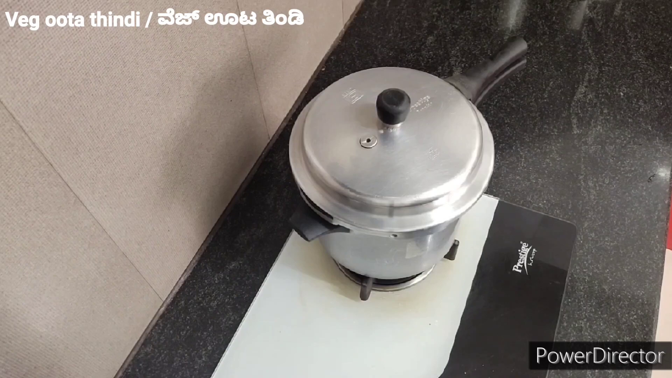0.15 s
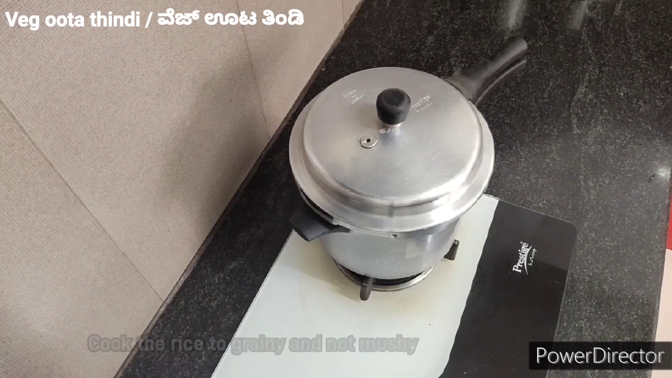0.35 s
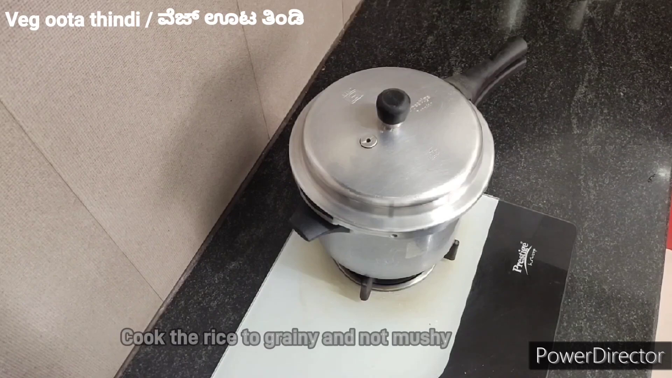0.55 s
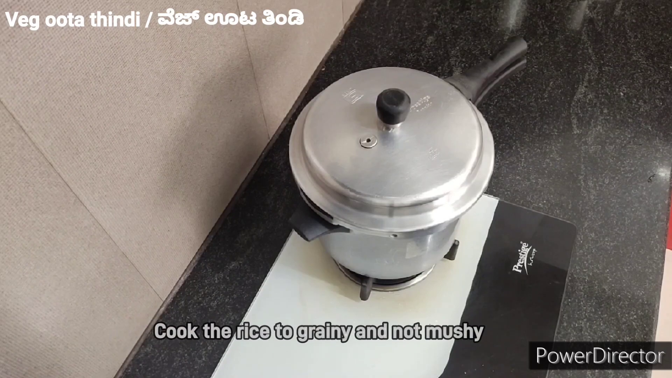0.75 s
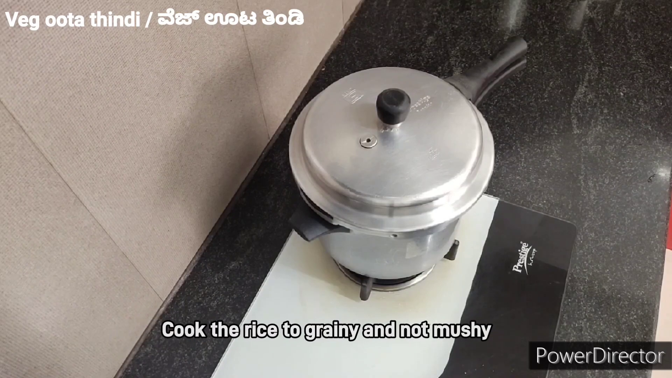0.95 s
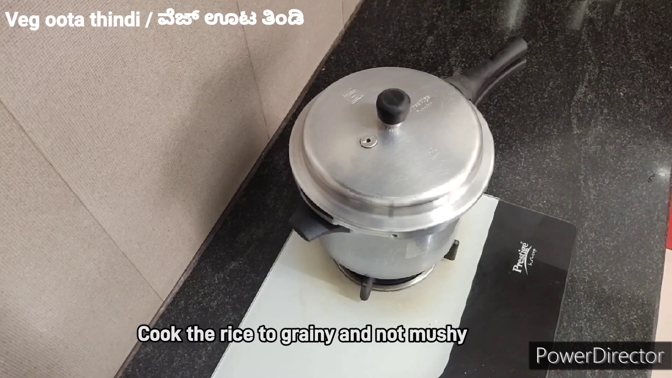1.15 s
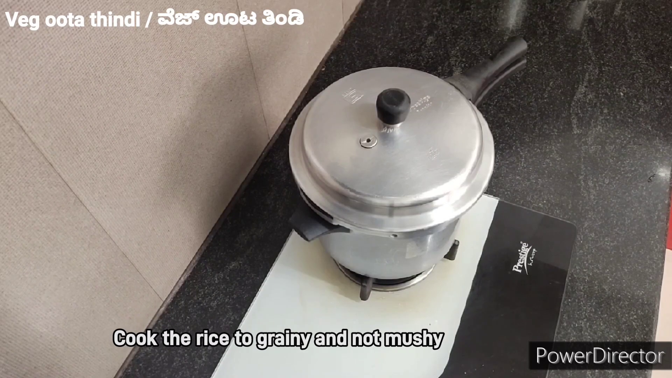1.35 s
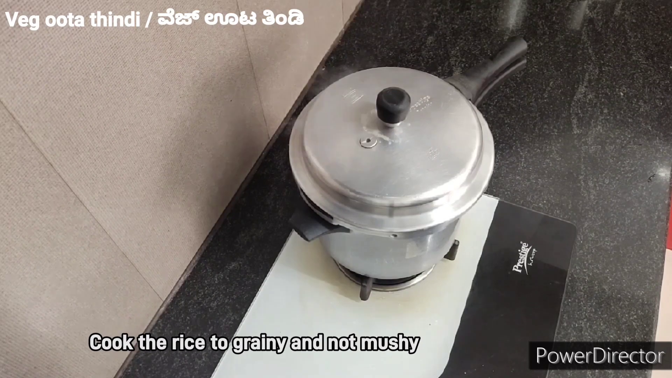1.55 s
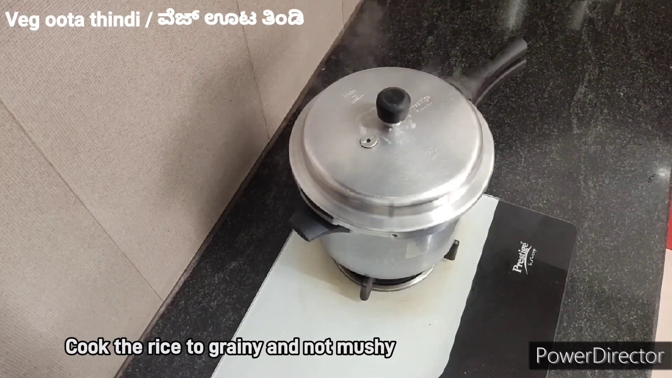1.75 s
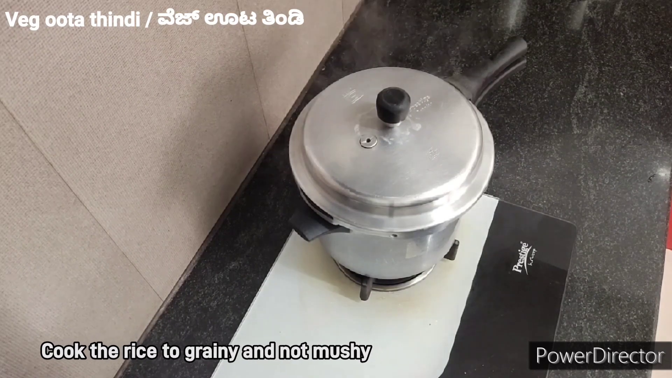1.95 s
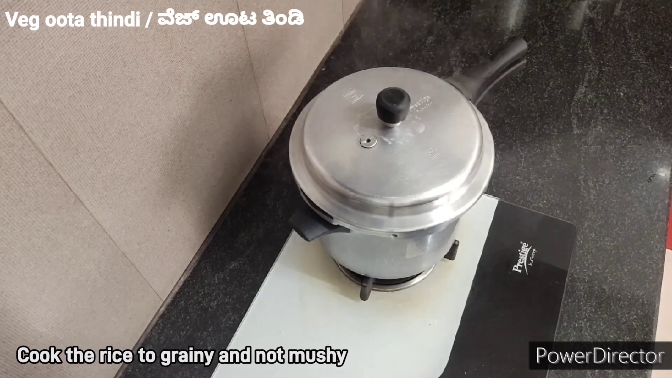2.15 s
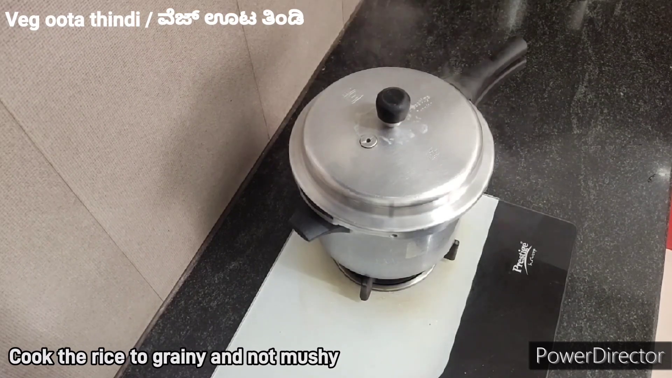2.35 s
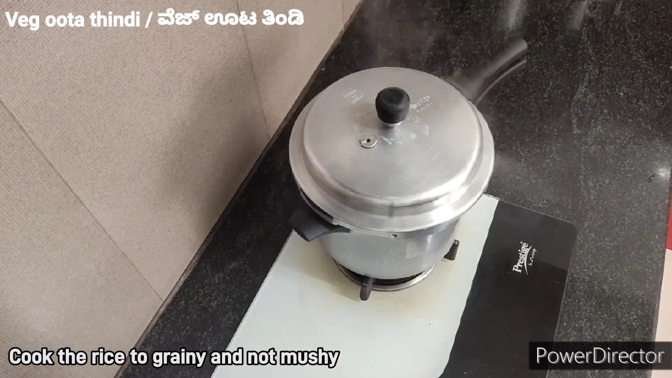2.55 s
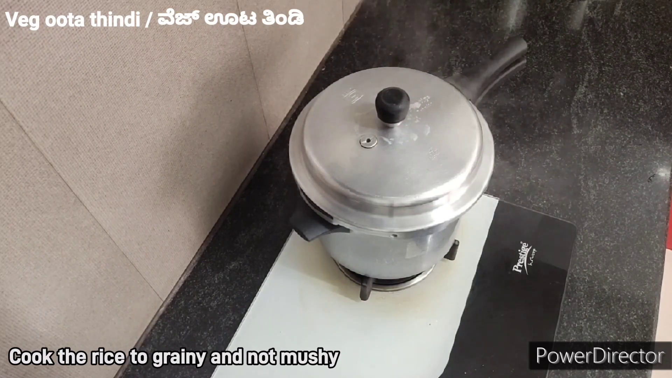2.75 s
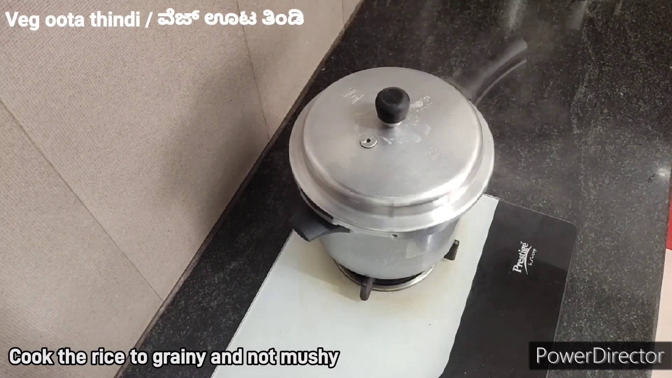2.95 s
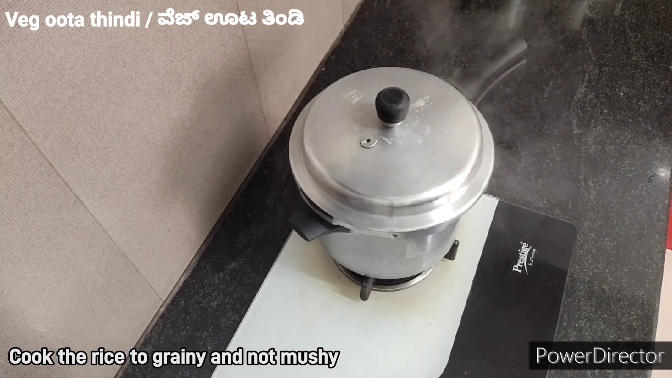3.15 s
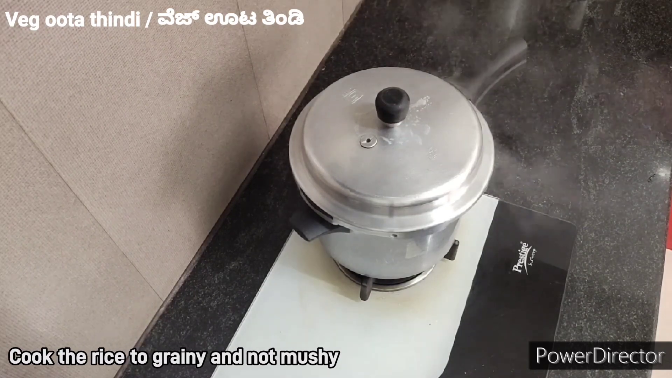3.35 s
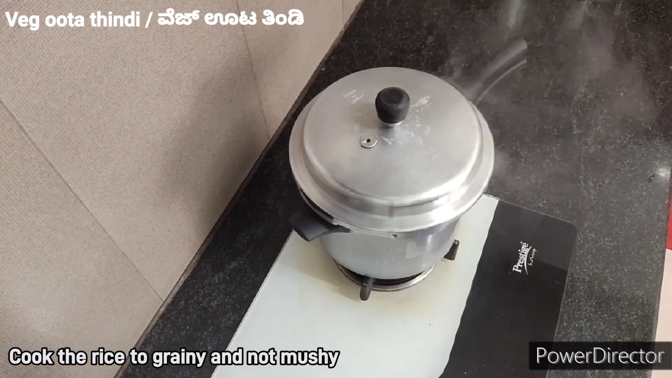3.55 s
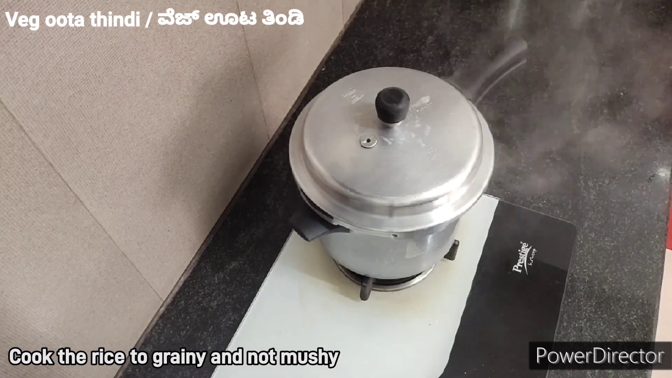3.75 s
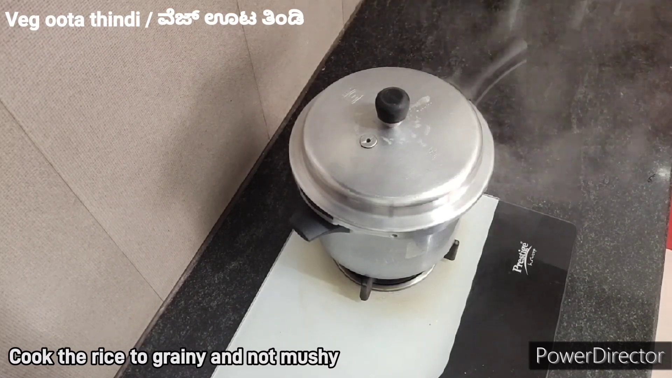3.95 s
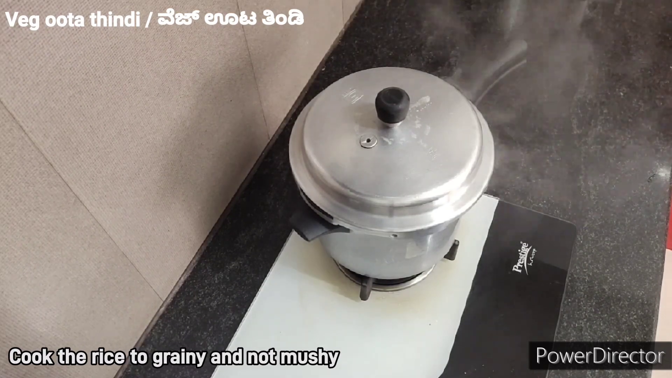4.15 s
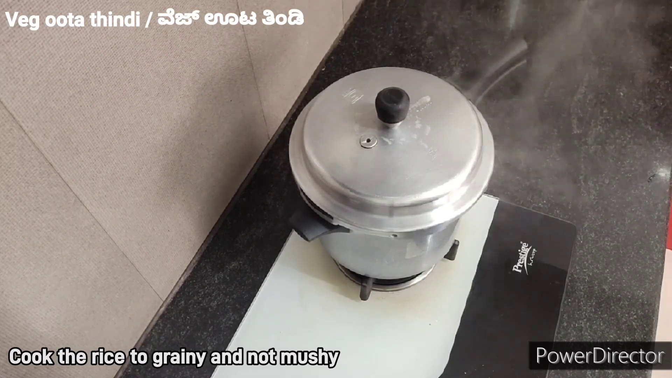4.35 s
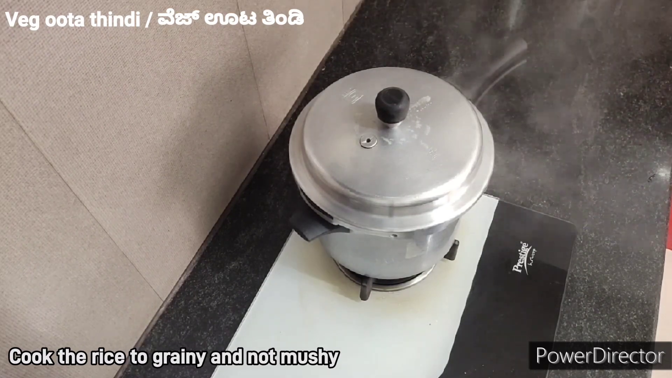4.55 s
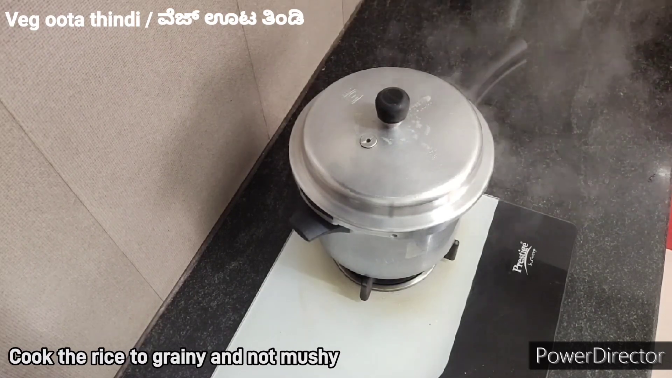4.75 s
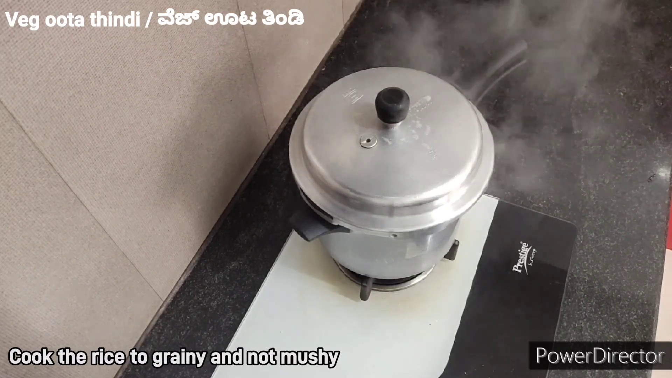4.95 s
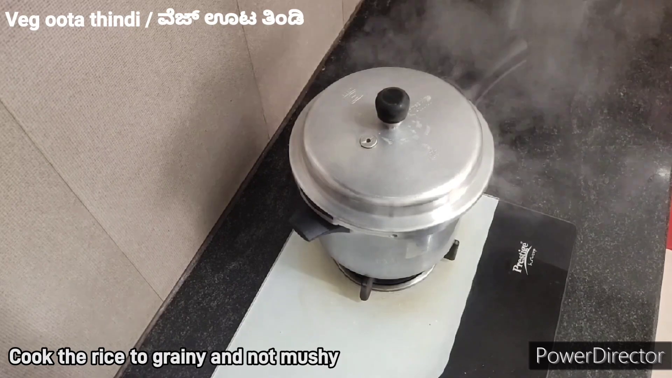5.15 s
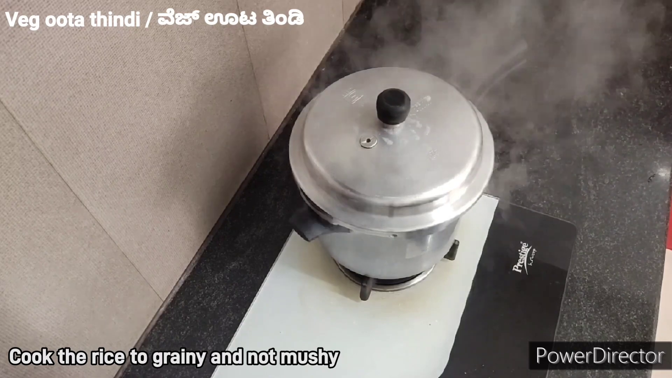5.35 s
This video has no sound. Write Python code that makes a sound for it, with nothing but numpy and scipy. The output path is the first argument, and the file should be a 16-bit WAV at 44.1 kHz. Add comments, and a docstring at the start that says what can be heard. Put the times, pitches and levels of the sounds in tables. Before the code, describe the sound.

Close above a pressure cooker on a gas burner in a hard tiled kitchen. Soft low flame murmur, muffled bubbling and a thin sharp steam leak build slightly, then at about 1.7 seconds the weight lifts with wet spits and a loud bright hiss bursts out and holds to the end, dulling a little late.

```python
"""Pressure cooker on a gas burner

Heard from just above the lid in a tiled kitchen: flame and bubbles murmur, and steam leaks past the weight.
The weight lifts with wet spurts, and the full jet hisses. Steam is noise plus droplet impulses, coloured by
gap and lid; the plume and stove are low noise, bubbles are rising rings, hums and whistles narrow noise.
A synthetic response of decaying random echoes spreads the hiss as a hard room does."""
import sys
import numpy as np
from scipy import signal
from scipy.fft import rfft, irfft, next_fast_len
from scipy.io import wavfile
from scipy.ndimage import uniform_filter1d

SR = 44100
rng = np.random.default_rng(int(sys.argv[2]) if len(sys.argv) > 2 else 0)


def to_wav(sig):
    """Store sig (one row per channel, or 1-D mono) as 16-bit WAV at the path in sys.argv[1].

    Samples outside -1..1 are clipped; the rate is SR.
    """
    pcm = np.clip(np.atleast_2d(sig), -1, 1) * 32767
    pcm = np.round(pcm).astype(np.int16)
    wavfile.write(sys.argv[1], SR, pcm.T)  # frames by channels


N = 237698
PADDED = next_fast_len(N + SR, True)  # room for echoes to die
TIME, BINS = np.arange(N) / SR, np.fft.rfftfreq(PADDED, 1 / SR)


def gain_of(db):
    """Decibels to an amplitude factor."""
    return 10 ** (np.asarray(db) / 20)


def evened(x):
    """Scales to an rms of one."""
    return x / np.sqrt(np.mean(x ** 2) + 1e-20)


def read(points, hz):
    """Interpolates each column of a table over log frequency."""
    f, *columns = np.transpose(points)
    return [np.interp(np.log(hz + 1), np.log(f + 1), c) for c in columns]


def follow(rows):
    """Interpolates each column of a table over time."""
    s, *columns = np.transpose(rows)
    return [np.interp(TIME, s, c) for c in columns]


def coloured(x, gain):
    """Filters by a gain for each frequency bin."""
    return irfft(rfft(x, PADDED) * gain, PADDED)[..., :N]


def wander(rate_hz):
    """Random motion of rms one, mostly slower than the rate."""
    return evened(coloured(rng.standard_normal(N), np.exp(-(BINS / rate_hz) ** 2)))


def crest(s, half_s):
    """Gaussian bump of height one, down to 1/e at the half length."""
    return np.exp(-((TIME - s) / half_s) ** 2)


def step(s, half_s):
    """Smooth rise from zero to one."""
    return .5 + .5 * np.tanh((TIME - s) / half_s)


def pair(spectrum, likeness):
    """Coloured noise at two ports, correlated by the likeness."""
    a, b = evened(coloured(rng.standard_normal((2, N)), gain_of(read(spectrum, BINS)[0])))
    likeness = np.clip(likeness, -1, 1)
    return np.array([a, likeness * a + np.sqrt(1 - likeness ** 2) * b])


def swells(rows, width_hz):
    """Breathy tones: narrow bands of noise that come and go."""
    out = np.zeros(N)
    for s, half_s, hz, db in rows:
        resonance = 1 / (1 + (2 * (BINS - hz) / width_hz) ** 2)
        band = evened(coloured(rng.standard_normal(N), resonance))
        out += gain_of(db) * band * crest(s, half_s)
    return out


# Flame and boil. Each row: time in seconds, level in dB.
STOVE_LEVEL = [(0, -65.5), (.7, -65), (.97, -66), (1.28, -63.5), (1.35, -54.5), (1.55, -60.5), (1.68, -62),
               (5.39, -94)]
# Their spectrum. Each row: frequency in Hz, relative density in dB per Hz.
STOVE_SPECTRUM = [(18, -7), (32, -6), (50, 5), (62, -8), (75, 9), (93, -10), (118, -0.5), (170, -4.5),
                  (290, -5.5), (400, -16), (540, -11.5), (800, -24), (2000, -49)]


def stove():
    """Flame and boiling water: low noise, nearly alike at both ports."""
    level_db = follow(STOVE_LEVEL)[0] + 0.46 * wander(21)
    return pair(STOVE_SPECTRUM, likeness=0.93) * gain_of(level_db)


# Faint hums. Each row: crest in seconds, half length in seconds, centre in Hz, level in dB.
HUMS = [(0.02, 0.025, 857, -63), (.5, 0.18, 896, -75), (0.082, 0.13, 264, -62.5), (.2, 0.08, 122, -63),
        (.55, 0.3, 116, -63), (.87, 0.11, 314, -66.5), (1.15, 0.11, 308, -67), (1.36, 0.033, 120, -60),
        (1.5, 0.096, 113, -57.5), (1.728, 0.058, 290, -58)]


def hums():
    """Faint low narrow-band noises swell and fade."""
    return swells(HUMS, width_hz=44)


def burble(level_db=-72, bubbles_per_s=45, low_hz=447, high_hz=1910, decay_s=0.013, glide_per_s=1.1, sizes=24):
    """Bubbles burst inside the pot, muffled by the lid; each size rings briefly and rises in pitch."""
    age, out = np.arange(SR // 8) / SR, np.zeros(N)
    envelope = age / decay_s * np.exp(-age / decay_s)
    for hz in np.geomspace(low_hz, high_hz, sizes):
        ring = envelope * np.sin(2 * np.pi * hz * age * (1 + glide_per_s * age / 2))
        pops = (rng.random(N) < bubbles_per_s / sizes / SR) * rng.uniform(.5, 2, N)
        out += signal.oaconvolve(pops, ring)[:N]
    return gain_of(level_db) * evened(out)


# Resonances of lid and weight. Each row: centre in Hz, width in Hz, lift in dB.
LID_RINGS = [(1745, 35, 3), (2300, 110, 2.5), (2440, 40, 2), (2596, 32, 3), (2749, 24, 3.5),
             (2825, 30, 2.5), (2909, 24, 3.5), (2965, 22, 3), (3035, 28, 4), (3149, 22, 2), (3380, 38, 4.5),
             (3550, 30, 3), (3603, 32, 3.5), (3849, 24, 2.5), (5100, 200, 2), (5775, 38, 4),
             (6627, 80, 1.5), (7090, 60, 2), (7276, 54, 1.5), (7628, 24, 3), (8058, 43, 3.5), (8204, 20, 3)]


def steam(level_db, throat_db, edge_db, fizz_db, spectrum, drops_db, drops_per_s,
          flutter_db, flutter_hz, surge_db):
    """Three streams of turbulence and bursting droplets, coloured by the weight's cavity and the lid."""
    chance, size = rng.random(N), np.minimum(rng.exponential(1, N), 4)
    turbulence, splash = rng.standard_normal(size=(2, 3, N))
    drops = evened((chance < drops_per_s / SR) * size * np.sign(splash))
    # the loose weight chatters and chops the flow
    chatter = gain_of(flutter_db * wander(flutter_hz) + surge_db * wander(39))
    drive = (turbulence + gain_of(drops_db) * drops) * chatter
    rings_db = sum(db / (1 + (2 * (BINS - hz) / width_hz) ** 2) for hz, width_hz, db in LID_RINGS)
    hiss = evened(coloured(drive, gain_of(read(spectrum, BINS)[0] + rings_db)))

    def below(hz):
        return coloured(hiss, .5 - .5 * np.tanh((BINS - hz) / 350))

    # as the gap changes, throat, edge tone and fizz move against the body
    under_body, under_edge, under_fizz = below(2000), below(4100), below(9200)
    throat = under_body * gain_of(throat_db + 0.82 * wander(26))
    body = under_edge - under_body
    edge = (under_fizz - under_edge) * gain_of(edge_db + 0.48 * wander(24))
    fizz = (hiss - under_fizz) * gain_of(fizz_db + 1.2 * wander(40))
    return (throat + body + edge + fizz) * gain_of(level_db)


def patchy(x, depth_db, size=2048):
    """The wobbling weight shifts emphasis among narrow bands; broad bands stay nearly steady."""
    z = signal.stft(x, nperseg=size)[2]
    field = rng.standard_normal(z.shape[-2:])
    field = uniform_filter1d(uniform_filter1d(field, size=4, axis=0), size=4, axis=1)
    field = field - uniform_filter1d(field, size=50, axis=0)
    return signal.istft(z * gain_of(depth_db * evened(field)), nperseg=size)[1][..., :N]


# Leak spectrum. Each row: frequency in Hz, relative density in dB per Hz.
LEAK_SPECTRUM = [(300, -22.5), (780, -22), (1050, -20), (1400, -11), (1750, -15.5), (2250, -9),
                 (2550, -10.5), (2780, -4.5), (3050, -11.5), (3300, -13.5), (3750, -17), (4400, -11),
                 (5100, -8.5), (6100, -11.5), (7100, 1.5), (8100, -4.5), (9300, -22.5), (15400, -22)]
# The weight rocks and lets more through. Each row: crest in seconds, half length in seconds, lift in dB.
LEAK_PUFFS = [(0.01, 0.043, 8), (0.123, 0.071, 3.5), (0.775, 0.07, 2), (0.89, 0.061, 2.5), (1.14, 0.064, 3),
              (1.42, 0.08, 1.5)]


def leak(start_db=-49, rise_db_per_s=3, throat_db=-2.5, edge_db=-2.0, fizz_db=-2.5,
         throat_per_db=0.7, edge_per_db=0.53, fizz_per_db=1.28):
    """Steam seeps past the seated weight, sharper as pressure builds and broader in each puff."""
    build_db = rise_db_per_s * TIME
    puffs_db = sum(db * crest(s, half_s) for s, half_s, db in LEAK_PUFFS)
    return steam(start_db + build_db + puffs_db,
                 throat_db + throat_per_db * puffs_db,
                 edge_db + edge_per_db * build_db,
                 fizz_db + fizz_per_db * (build_db + puffs_db),
                 LEAK_SPECTRUM, drops_db=-12, drops_per_s=1300,
                 flutter_db=0.5, flutter_hz=250, surge_db=1.0)


# Wet spurts. Each row: start in seconds, level in dB, centre in Hz, decay in seconds.
SPURTS = [(1.551, -49, 3000, 0.0023), (1.597, -33.5, 2280, 0.0032), (1.608, -42, 1990, .014),
          (1.636, -41, 1400, .006), (1.649, -32, 1030, 0.0026), (1.65, -25.5, 3800, 0.0035),
          (1.662, -39, 3600, .022), (1.718, -39, 1000, 0.028), (1.718, -29, 2900, .014),
          (1.82, -36, 330, 0.0027), (1.896, -27.5, 1700, .004), (1.932, -26.5, 434, 0.0024),
          (1.985, -43, 350, .003), (2.507, -30, 550, 0.0076), (3.378, -42, 130, 0.0087),
          (3.736, -29.5, 400, 0.0069), (4.636, -37, 500, 0.0049)]


def spurts():
    """Slugs of water clear the vent, each a short broad puff."""
    out = np.zeros(N)
    for s, db, hz, decay_s in SPURTS:
        broad_band = np.exp(-(np.log((BINS + 1) / hz) / 0.89) ** 2)
        puff = evened(coloured(rng.standard_normal(N), broad_band))
        age = np.maximum(TIME - s, 0) / decay_s
        out += gain_of(db) * puff * age * np.exp(1 - age)
    return out


# Roar of the plume. Each row: time in seconds, level in dB.
PLUME_LEVEL = [(1.70, -62), (1.79, -53.5), (1.84, -43.5), (1.95, -45.5), (2.1, -44.5), (2.4, -46.5),
               (2.88, -41.5), (3.15, -42), (3.27, -43.5), (3.4, -40), (3.8, -42.5), (4.15, -45),
               (4.95, -47), (5.12, -50)]
# Its spectrum. Each row: frequency in Hz, relative density in dB per Hz.
PLUME_SPECTRUM = [(60, -26), (110, -15.5), (170, -2.3), (270, 1), (400, -1), (550, -0.4), (850, -4),
                  (1400, -11), (3000, -26.5)]
# Eddies striking the ports. Each row: frequency in Hz, relative density in dB per Hz.
BUFFET_SPECTRUM = [(15, -12), (32, -15), (45, -12), (70, 1.5), (120, 3), (180, -1.5), (400, -33)]


def plume(buffet_db=-18.5, buffet_growth_db_per_db=1.74):
    """Eddies in the steam cloud make a lumpy roar and buffet the ports, deeper as the roar grows."""
    risen = np.clip((TIME - 1.6) / 0.19, 0, 1)
    level_db = follow(PLUME_LEVEL)[0]
    # buffeting re the roar; the growth is on top of the roar's own
    deep_db = buffet_db + buffet_growth_db_per_db * (level_db - np.median(level_db))
    roar = pair(PLUME_SPECTRUM, likeness=0.077) * gain_of(1.54 * wander(87) + 0.13)
    buffets = pair(BUFFET_SPECTRUM, likeness=0.21) * gain_of(deep_db + 2.0 * wander(40) + 2.0 * wander(5.5))
    port_offset_db = np.array([[-.6], [.6]])
    return risen * (roar + buffets) * gain_of(level_db + port_offset_db)


OPEN_S, OPEN_DB_PER_S = 1.7175, 177  # gap fully open; swell up to it
# Jet spectrum. Each row: frequency in Hz, relative density in dB per Hz.
JET_SPECTRUM = [(300, -33.5), (900, -21), (1400, -15), (2000, -12), (2900, -8.5), (3550, -8), (4000, -13.5),
                (5800, -10.5), (6800, -3), (7400, 1.5), (8000, -1.5), (9000, -15), (10300, -24.5),
                (11500, -18.5), (14000, -22), (15200, -18)]


def jet(held_db=-22, throat_db=-2.15, edge_db=0.88, fizz_db=2.2, throaty_db=9.5, dulled_db=2.0,
        burst_db=2.3, widen_db_per_s=0.285, sag_db_per_s=0.6, settle_db=1.5, sway_db=0.1):
    """The jet swells, overshoots and holds; throaty while the gap opens, duller as pressure sags."""
    opening_db = OPEN_DB_PER_S * np.minimum(TIME - OPEN_S, 0)
    held_s = np.maximum(TIME - OPEN_S, 0)
    throaty = crest(1.73, 0.06)
    burst = burst_db * crest(1.825, 0.052)
    # the gap creeps wider, so the body grows slightly
    level_db = held_db + opening_db + burst + widen_db_per_s * held_s + sway_db * wander(16)
    # late on the weight settles a little and dulls the treble
    sag_db = sag_db_per_s * held_s + settle_db * step(5.0, 0.017)
    dull_db = sag_db + dulled_db * throaty
    return steam(level_db, throat_db + throaty_db * throaty, edge_db - dull_db, fizz_db - dull_db,
                 JET_SPECTRUM, drops_db=-17.0, drops_per_s=400,
                 flutter_db=-0.08, flutter_hz=303, surge_db=0.35)


# Broad gap resonances. Each row: centre in Hz, half width in Hz, sway in dB, shift as the weight sinks in dB.
GAP_BANDS = [(2280, 90, 1.5, -1.5), (2910, 96, 1.5, 0.5), (3470, 180, 1.4, -2.1)]


def swaying(x, rate_hz):
    """Gap resonances sway separately as the weight wobbles; the middle one takes over as it sinks."""
    sunk = step(4.6, .2)  # pressure falls
    out = x
    for hz, half_hz, sway_db, shift_db in GAP_BANDS:
        band = coloured(x, np.exp(-((BINS - hz) / half_hz) ** 2))
        out = out + band * (gain_of(sway_db * wander(rate_hz) + shift_db * sunk) - 1)
    return out


def vent():
    """The leak gives way to the full jet as the weight rises."""
    seated = 1 - step(OPEN_S, 0.027)
    return seated * patchy(leak(), depth_db=2.4) + swaying(patchy(jet(), depth_db=2.0), rate_hz=7)


# Near-tones of the jet. Each row: crest in seconds, half length in seconds, centre in Hz, level in dB.
WHISTLES = [(1.76, 0.052, 2850, -30), (1.86, 0.018, 5200, -30), (2.795, .012, 5060, -30),
            (3.23, 0.097, 3020, -35), (3.31, .09, 3530, -35), (4.27, 0.072, 3340, -31),
            (4.43, 0.14, 2980, -35), (5.0, 0.12, 2940, -30)]


def whistles():
    """The jet nearly locks onto a tone: narrow noise that swells and fades."""
    return swells(WHISTLES, width_hz=73)


# Decay of the kitchen. Each row: frequency in Hz, T60 in seconds.
KITCHEN_DECAY = [(200, 0.6), (2000, 0.22), (7000, 0.15), (15000, 0.032)]


def kitchen(early_db, early_s, size=256):
    """Response at each port: close echoes off counter and wall, then a tail that dulls as it dies."""
    taps = rng.standard_normal((2, SR)) * (rng.random((2, SR)) < 4000 / SR)
    age = np.arange(SR) / SR
    taps *= (age > .002) * (1 + gain_of(early_db) * np.exp(-age / early_s))
    hz, t, z = signal.stft(taps, SR, nperseg=size)
    decay = gain_of(-60 * t / read(KITCHEN_DECAY, hz)[0][:, None])
    tail = signal.istft(z * decay, SR, nperseg=size)[1]
    response = rfft(tail, PADDED)
    # even over wide bands; fine ripple stays
    return response / np.sqrt(uniform_filter1d(abs(response) ** 2, size=1600, axis=1) + 1e-12)


# Two microphone ports. Each row: frequency in Hz, left-right balance in dB, direct power share from 0 to 1,
# left phase lead in radians.
PORTS = [(300, -1.2, 0.01, -0.1), (1100, -1.1, 0.21, 1.7), (1600, -5.5, 0.2, 0.9), (2350, 3.4, 0.34, -0.8),
         (2850, -2.5, 0.3, 0.8), (3300, -0.7, 0.26, -0.4), (5100, -1.1, 0.46, 0.0), (6000, -1.3, 0.17, 0.4),
         (6900, -7.0, 0.33, 3.2), (7400, -1.9, 0.41, 2.6), (8000, 6.9, 0.37, 2.9), (8600, 5.2, 0.15, 4.3),
         (9600, 0.7, 0.36, 6.4), (15000, -0.8, 0.06, 4.9)]


def scene():
    """The middle stream reaches both ports directly and by the room; each outer one scatters to one side."""
    balance_db, direct, lead_rad = read(PORTS, BINS)
    direct, side = np.clip(direct, 0, 1), np.array([[1], [-1]]) / 2
    balance, scattered = gain_of(side * balance_db), np.sqrt(1 - direct)
    straight = np.sqrt(direct) * np.exp(1j * side * lead_rad)
    room, echo_share = kitchen(early_db=7, early_s=.012), .33
    middle, *outer = vent()
    near = coloured(middle, balance * (straight + scattered * np.sqrt(echo_share) * room))
    wide = coloured(np.array(outer), balance * scattered * np.sqrt(1 - echo_share))
    sputter = coloured(spurts() + burble() + whistles(), straight + 0.3 * room)
    return near + wide + sputter + plume() + stove() + hums()


def record(dry, edge_hz=15470):
    """The recorder's band limit: a linear-phase low-pass."""
    low_pass = signal.firwin(511, edge_hz, window=("kaiser", 9), fs=SR)
    return signal.oaconvolve(dry, low_pass[None], "same")


dry = scene()
out = record(dry)
to_wav(out)
```